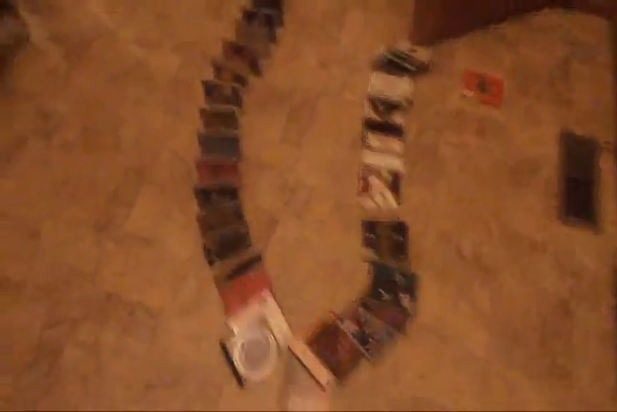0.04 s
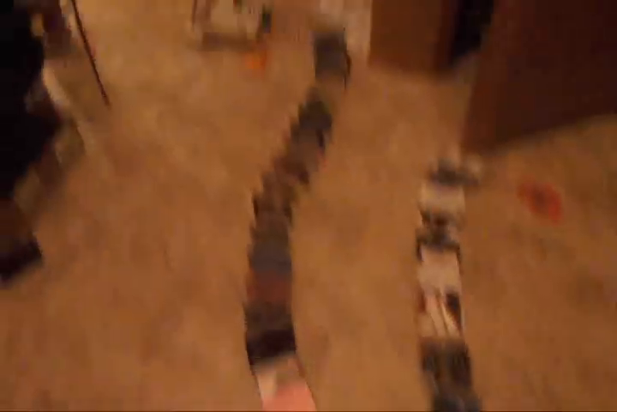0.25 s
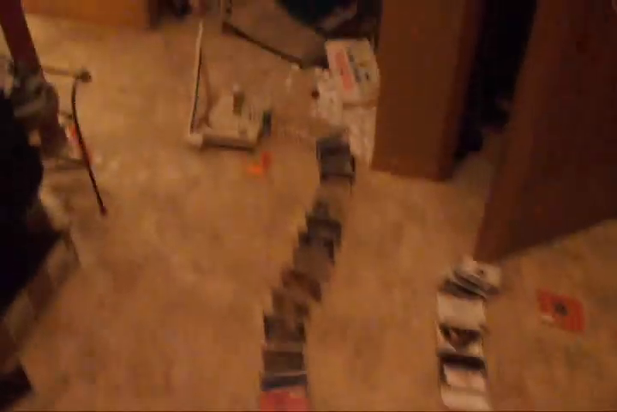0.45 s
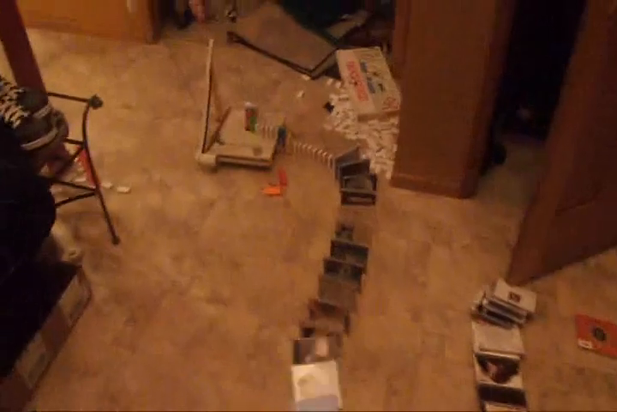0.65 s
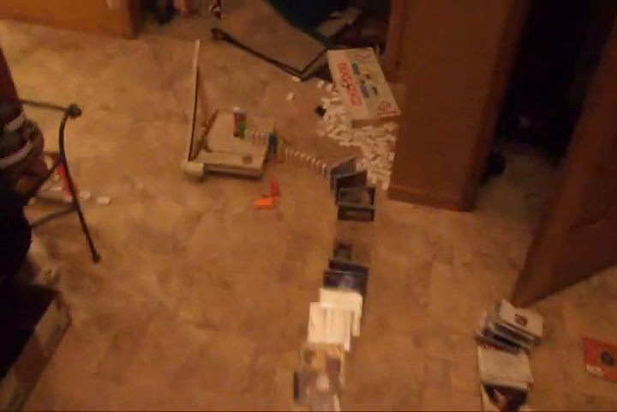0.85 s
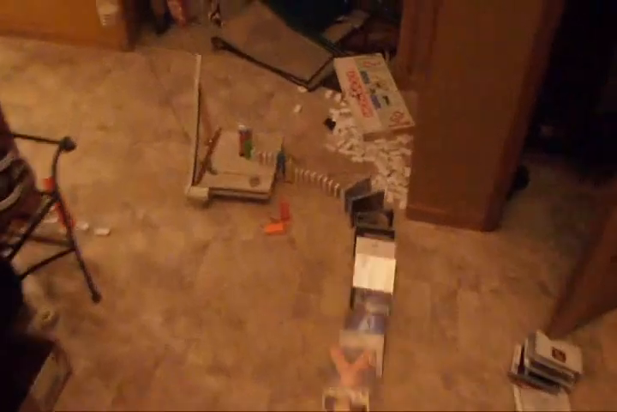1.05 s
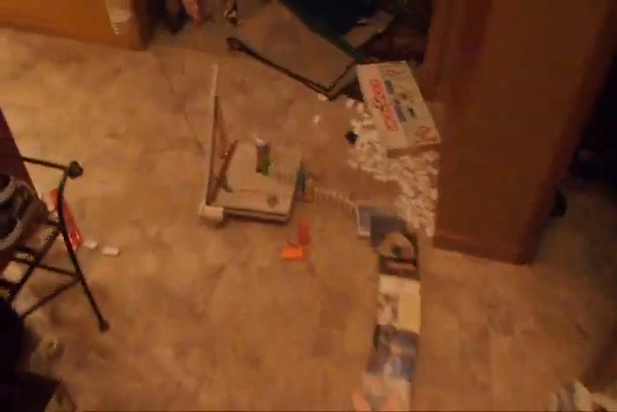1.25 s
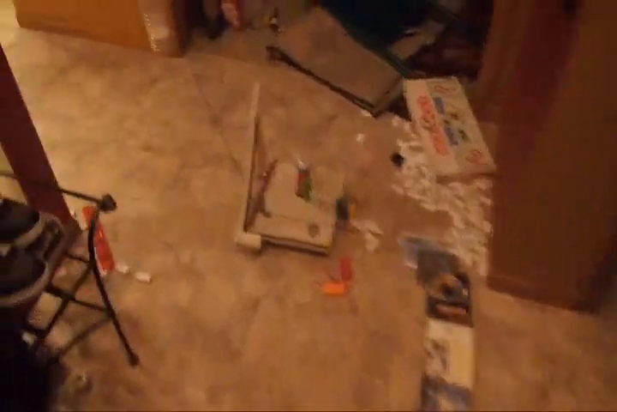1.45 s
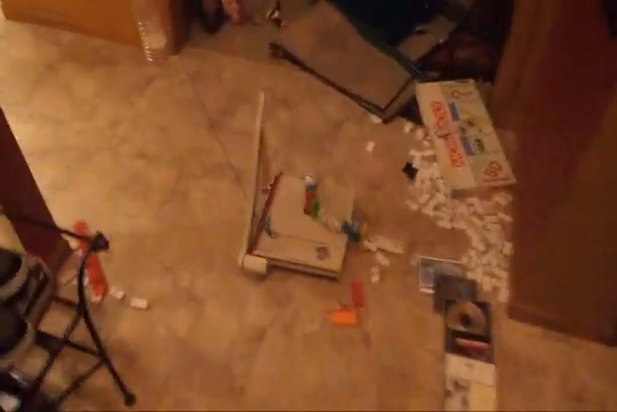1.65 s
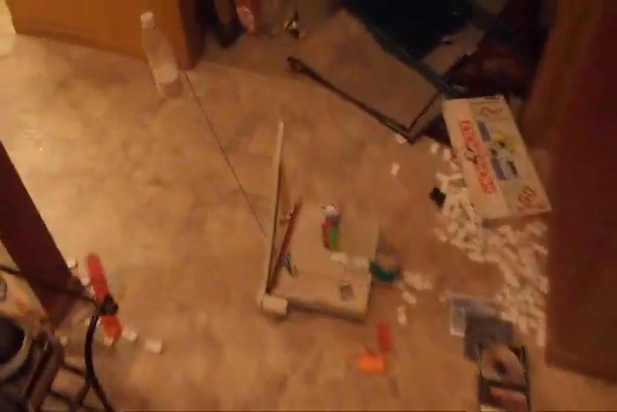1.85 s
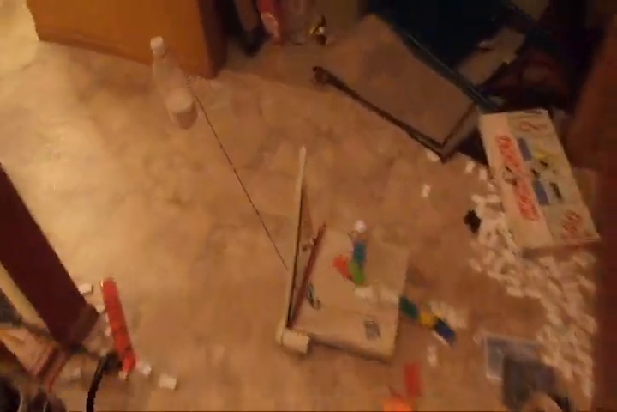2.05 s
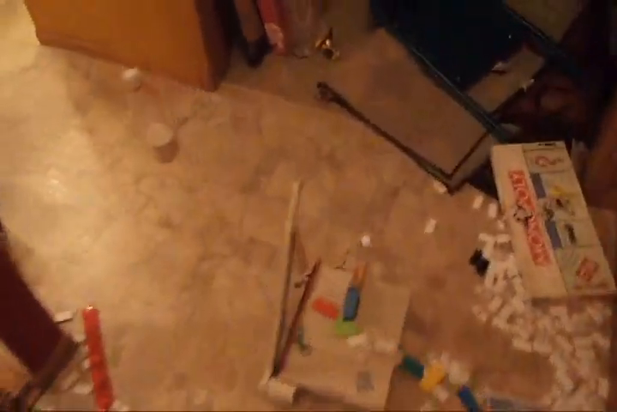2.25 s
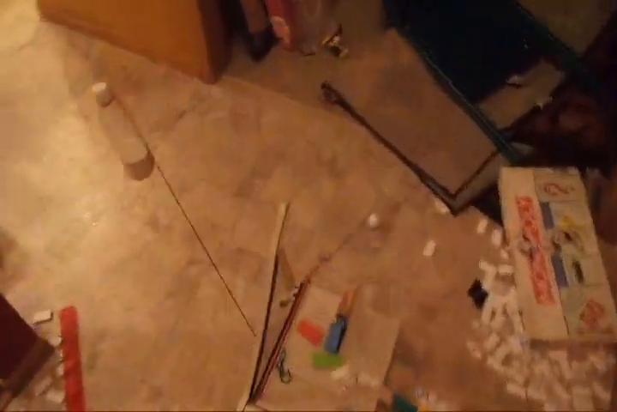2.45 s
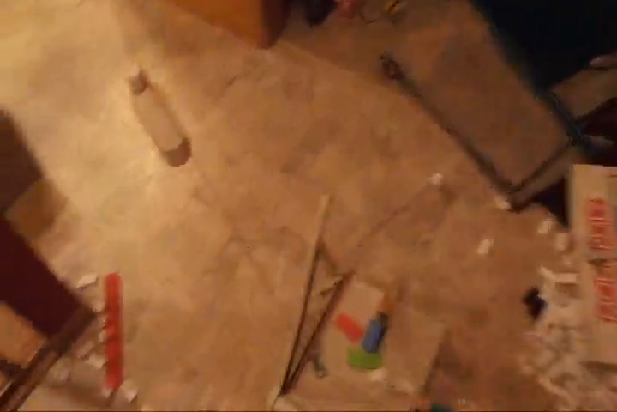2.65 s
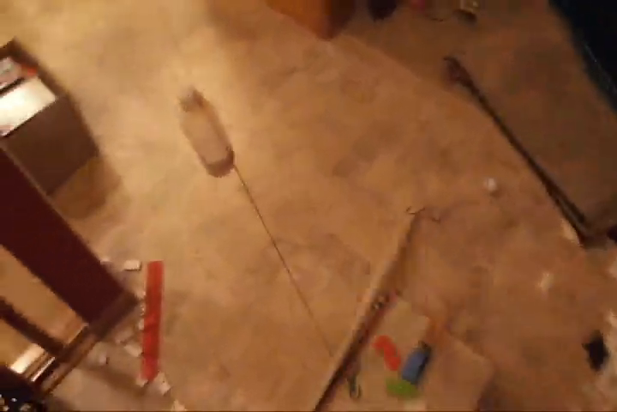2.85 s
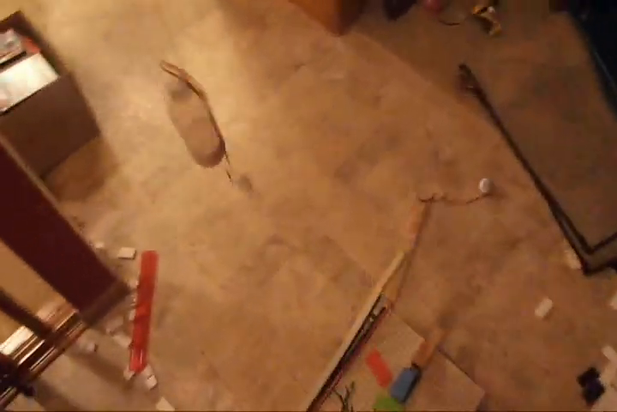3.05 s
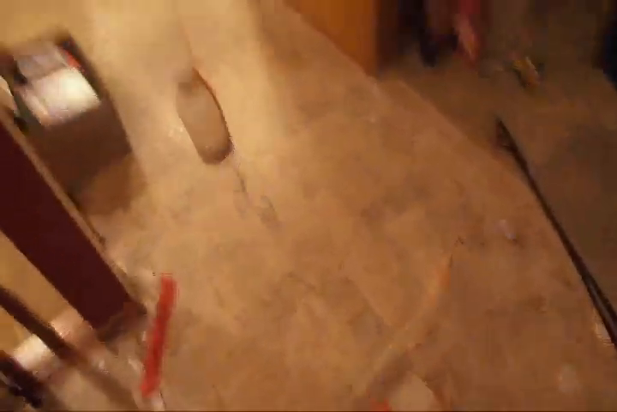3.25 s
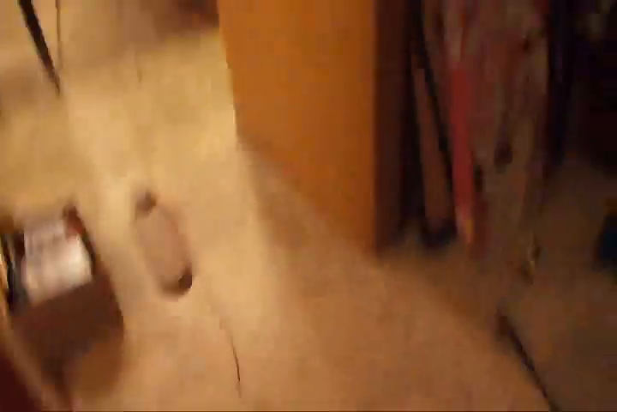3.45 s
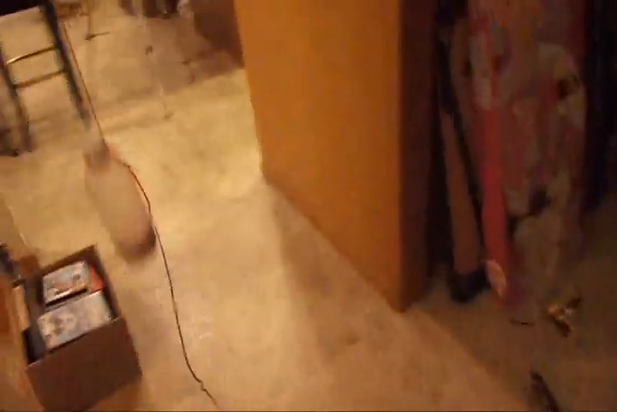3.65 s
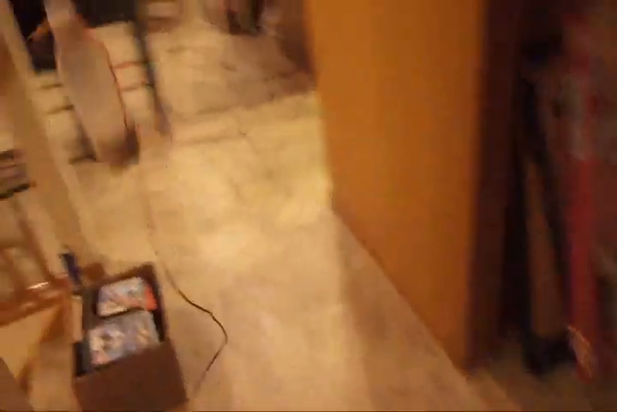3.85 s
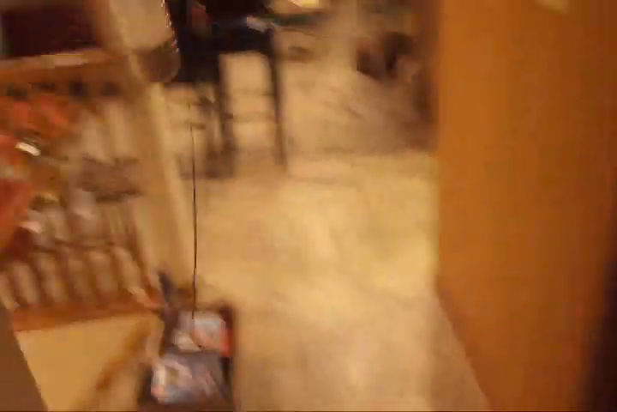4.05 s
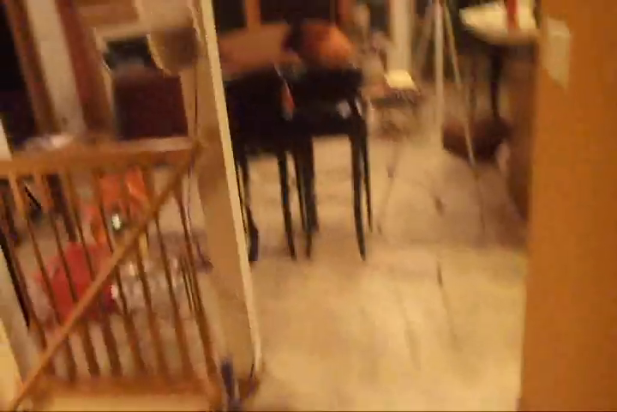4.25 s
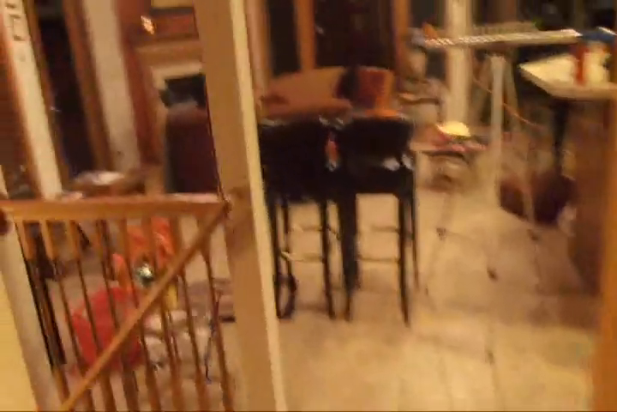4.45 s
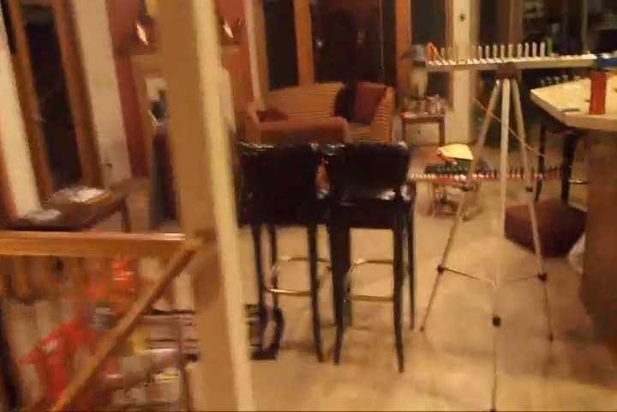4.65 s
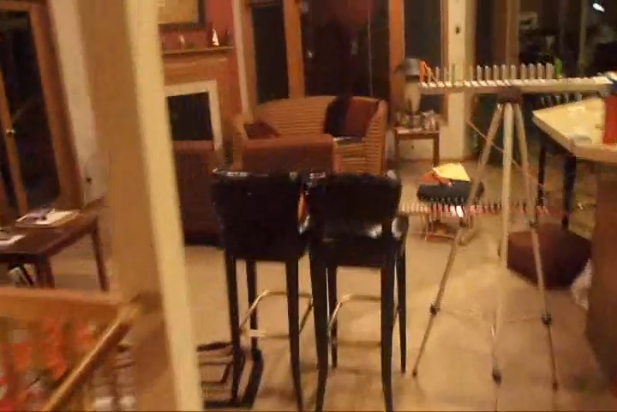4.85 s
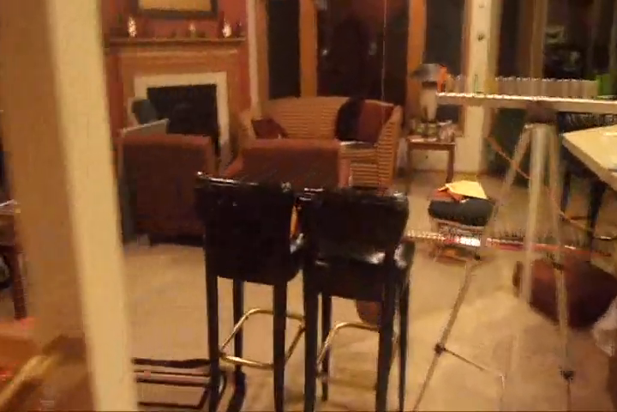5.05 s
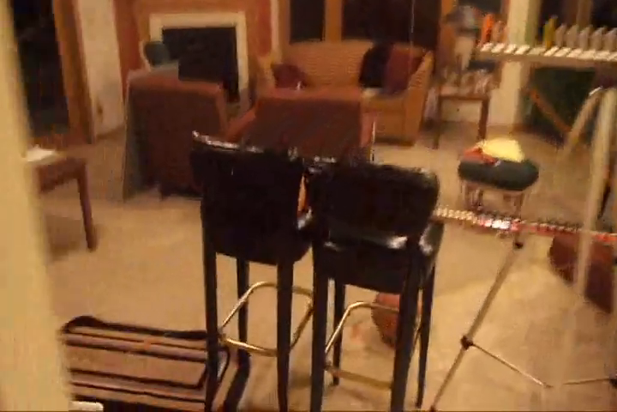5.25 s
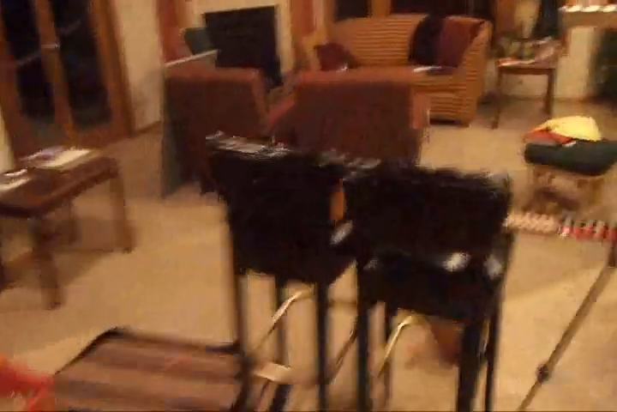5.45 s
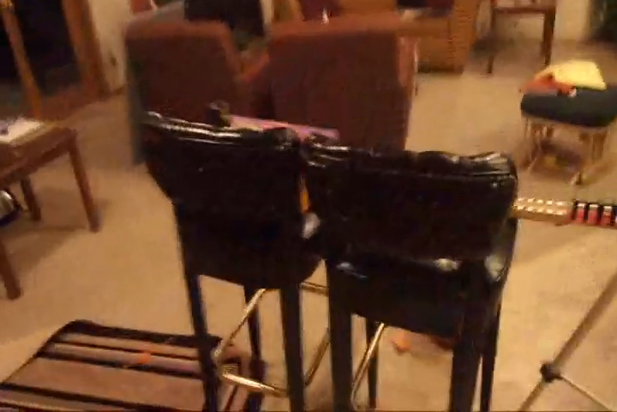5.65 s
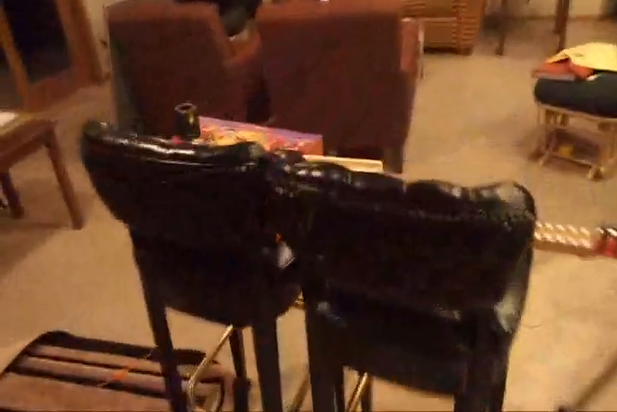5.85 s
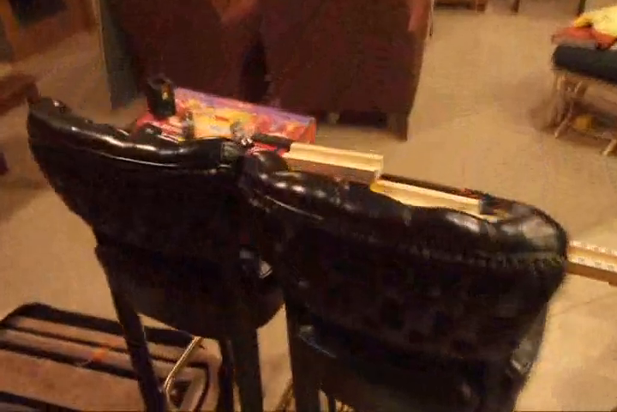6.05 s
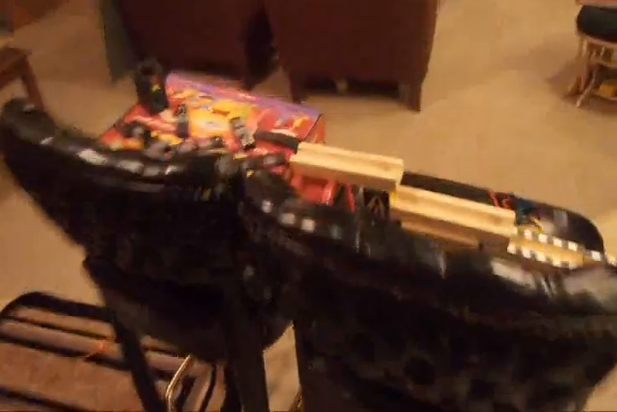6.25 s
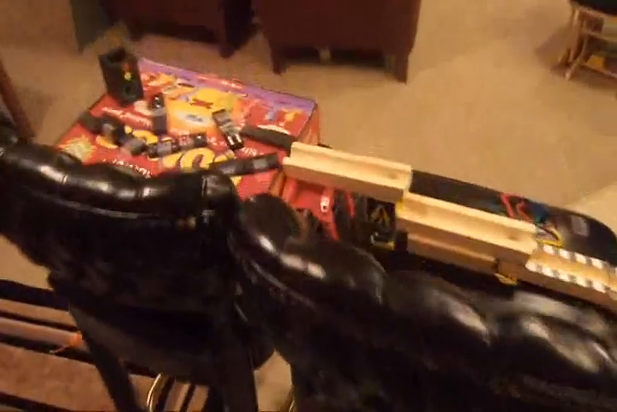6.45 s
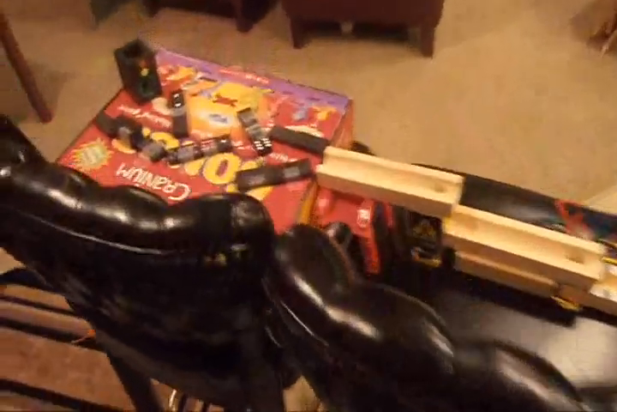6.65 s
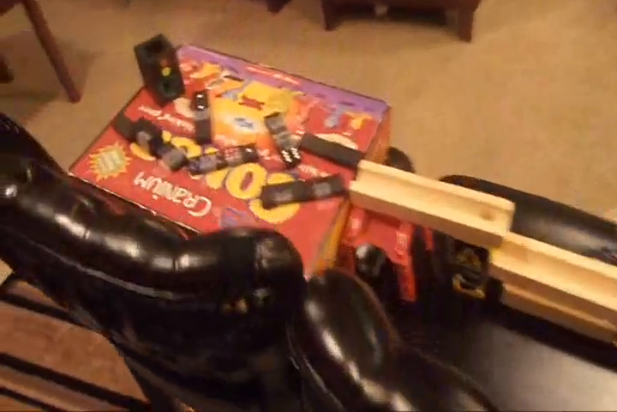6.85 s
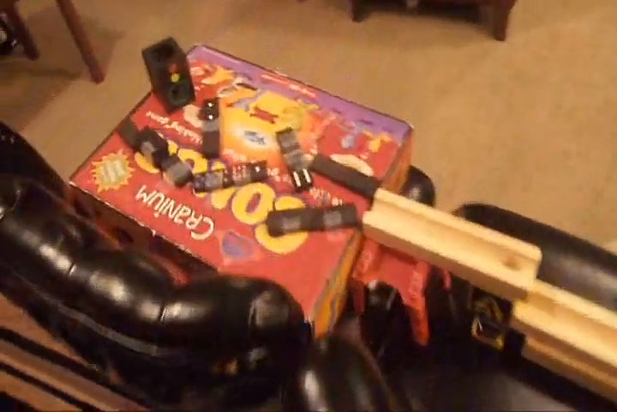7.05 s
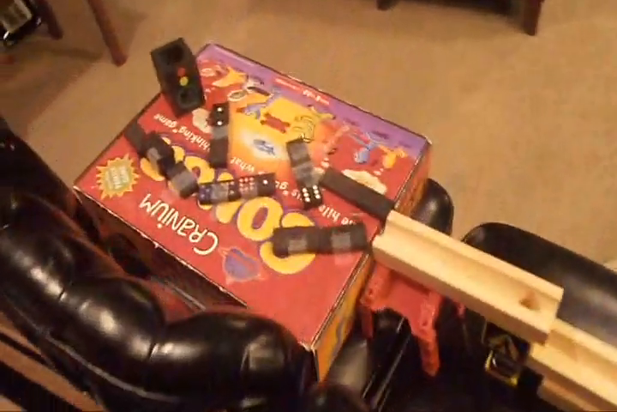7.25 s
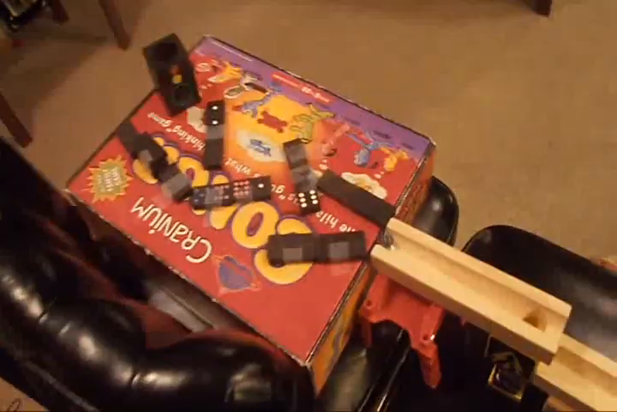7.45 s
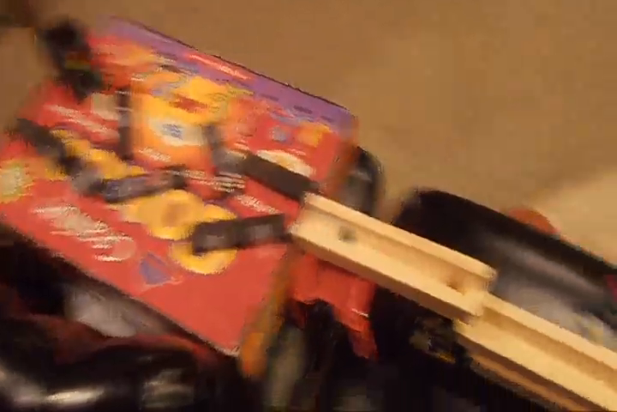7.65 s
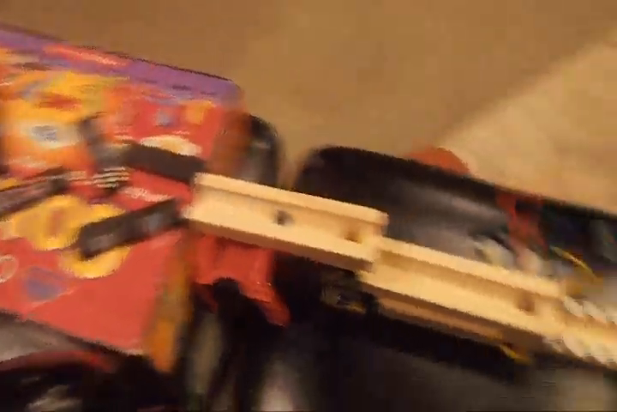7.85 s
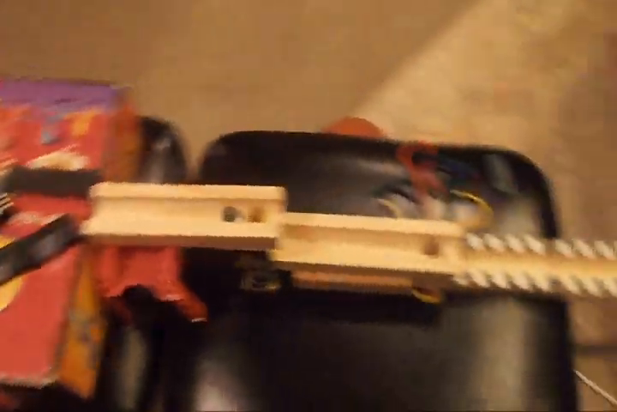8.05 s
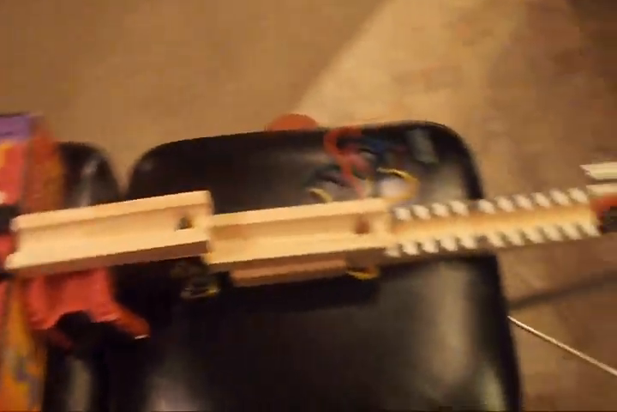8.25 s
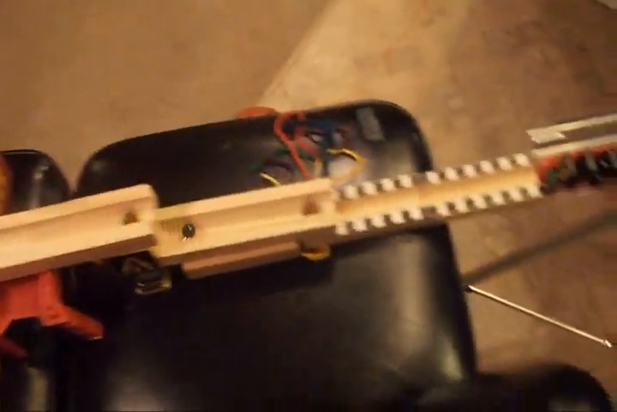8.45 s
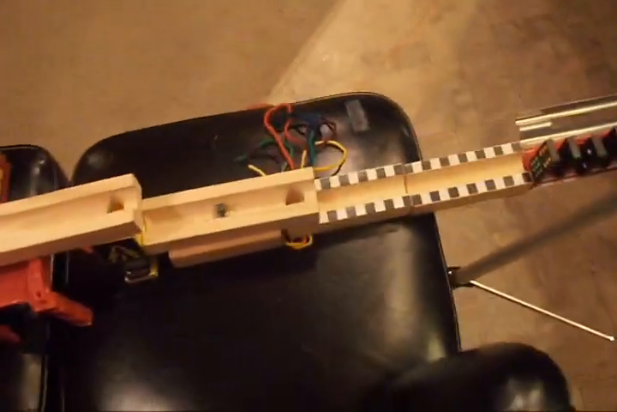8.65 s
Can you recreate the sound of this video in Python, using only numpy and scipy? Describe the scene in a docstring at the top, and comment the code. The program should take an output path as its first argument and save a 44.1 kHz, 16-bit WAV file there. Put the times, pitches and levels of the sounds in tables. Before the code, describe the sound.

From the start, a row of plastic cases topples on a hard indoor floor in rapid, hollow slaps. At about 1.4 seconds, small dominoes take over with a brighter clatter that thins out. Hard blocks click from 2.2 seconds, and a board knocks several times. A loose part rattles, then at 3 seconds a frame slams down, scrapes briefly and bounces until about 3.5. Low footstep thuds and brushing follow as the hand-held microphone moves. Further off, something knocks lightly near 4.8 seconds, lands loudly at 5.3 and bounces until 5.8, sliding or rolling in between. The brushing fades to a quieter stretch. Around 7.5 seconds a marble taps lightly on a wooden ramp, then strikes the end and drops onto the next ramp with sharp clicks from 8.3 to 8.5. The hits carry a short room echo over a faint hush, the loudest overloading slightly.

```python
"""A row of plastic cases topples on a hard floor indoors, each slapping down on the one before it.
Small hard tiles and blocks clatter down, a board knocks, a frame slams and bounces, something drops
further off and slides or rolls between bounces, and a marble falls through wooden ramps. Each blow is a
noisy crack plus ringing modes, echoed by the room. A hand-held microphone follows on foot, with thuds
and brushing over a faint hush; it colours the blows and overloads on the loudest."""
import sys
import numpy as np
from scipy import signal
from scipy.fft import rfft, irfft
from scipy.io import wavfile
from scipy.ndimage import uniform_filter1d

SR = 44100
rng = np.random.default_rng(int(sys.argv[2]) if len(sys.argv) > 2 else 0)


def dump_mix(stems):
    """Bounce the given channels to the path in sys.argv[1] as a 16-bit WAV at rate SR."""
    frames = np.atleast_2d(stems).T  # one column per channel
    limited = np.clip(frames, -1, 1)  # hard clip at full scale
    pcm = np.round(limited * 32767).astype(np.int16)
    wavfile.write(sys.argv[1], SR, pcm)


N = 384552
PLACES = 6  # room feeds; signal row 0 is the direct sound
OFF_DB = -np.inf


def undb(db):
    """Decibels to gain."""
    return 10 ** (np.asarray(db, float) / 20)


def unit(x):
    """Scale to rms 1."""
    return x / np.sqrt(np.mean(x ** 2))


def curve(points):
    """Interpolate (seconds, value) points per sample."""
    return np.interp(np.arange(N) / SR, *np.transpose(points))


def colour(x, points):
    """Minimum-phase filter through (Hz, dB) points."""
    hz, db = np.transpose(points)
    log_gain = np.interp(np.log(np.arange(1, 2050) * SR / 4096), np.log(hz), db) * np.log(10) / 20
    cepstrum = irfft(log_gain)
    cepstrum[1:2048] *= 2
    cepstrum[2049:] = 0
    return signal.fftconvolve(x, irfft(np.exp(rfft(cepstrum))))[:len(x)]


def noise(spectrum):
    """Noise of rms 1 shaped by (Hz, dB) points."""
    return unit(colour(rng.standard_normal(N), spectrum))


def wander(rate_hz):
    """Smooth random drift of rms 1."""
    hold = int(SR / rate_hz)
    steps = np.repeat(rng.standard_normal(N // hold + 1), hold)
    return unit(uniform_filter1d(uniform_filter1d(steps, hold), hold)[:N])


def swells(events, depth_db=30):
    """Envelope of swells, each falling depth_db a half length from its peak; powers add."""
    t = np.arange(0, N / SR + .01, .002)
    power = sum(undb(db - depth_db * np.abs(t - peak_s) / half_s) ** 2 for peak_s, db, half_s in events)
    return np.interp(np.arange(N) / SR, t, np.sqrt(power))


# Each row: frequency in Hz, relative level in dB.
HUSH_SPECTRUM = [(15, -50.5), (25, -16.5), (157, -3), (184, -7.5), (229, -5.5), (343, -6.5), (437, -8.5),
                 (474, -11.5), (692, -14), (883, -17.5), (2270, -27.5), (5110, -30), (15900, -32)]
def hush():
    """Faint, low, nearly steady background noise."""
    return undb(-43 + 0.5 * wander(2.6)) * noise(HUSH_SPECTRUM)


# Each row: peak time in seconds, level in dB.
THUDS = [(3.08, -21), (3.16, -23), (3.34, -27), (3.47, -27), (3.57, -29), (3.69, -28), (4.069, -38.5),
         (4.2, -42), (4.75, -28), (5.07, -48), (5.19, -32), (5.41, -37), (5.56, -31), (6.0, -45)]
# Each row: peak time in seconds, level in dB, half length in seconds.
FRICTION_SWELLS = [(3.8, -53.5, 0.33), (4.04, -38.5, 0.024), (4.67, -42, 1), (5.01, -44, 0.18),
                   (5.11, -38.5, 0.34), (5.5, -34.5, 0.29), (5.58, -32, 0.15), (5.72, -30.5, 0.23),
                   (5.86, -33.5, 0.2), (6.264, -40.5, 0.24), (6.51, -52, 0.031), (6.83, -46.5, 0.21),
                   (7.33, -51, 0.63), (7.9, -52.5, 0.27), (8.03, -52, 0.056), (8.22, -49, .2)]
# Each row: frequency in Hz, relative level in dB.
FRICTION_SPECTRUM = [(300, -12), (800, -4), (1300, -3), (1800, -13), (3000, -11.5), (4200, -24),
                     (6500, -17), (9000, -33.5)]
def thuds_and_friction(thud_half_s=0.11, rumble_db=-54):
    """Steps and the frame's landings thud through floor and hand.
    Cloth and soles brush, and the dropped thing slides or rolls between its bounces."""
    low = noise([(20, -30), (40, -12), (60, -4.5), (100, -13.5), (300, -58)])
    friction = noise(FRICTION_SPECTRUM)
    thuds = swells([(s, db, thud_half_s) for s, db in THUDS])
    handling = undb(rumble_db + 4.09 * wander(8.1))
    grain = undb(3 * wander(40))
    return (thuds + handling) * low + swells(FRICTION_SWELLS) * grain * friction


# Each row: frequency in Hz, T60 in seconds.
ROOM_DECAY = [(125, 0.54), (300, 0.62), (700, 0.49), (1800, 0.67), (4800, 0.373), (12000, 0.14)]
def room(x, tail_db=-4.5, build_s=0.0028):
    """Hard walls and floor return a diffuse tail from each place; the treble dies first."""
    t = np.arange(int(.9 * SR)) / SR
    bin_hz, frame_s, spectra = signal.stft(rng.standard_normal((PLACES, len(t))), SR, nperseg=256)
    hz, t60_s = np.transpose(ROOM_DECAY)
    bin_t60_s = np.interp(np.log(bin_hz + 1), np.log(hz), t60_s)[:, None]
    spectra *= np.exp(-np.log(1000) * frame_s / bin_t60_s)
    tails = signal.istft(spectra, SR, nperseg=256)[1][:, :len(t)]
    tails *= 1 - np.exp(-t / build_s)
    tails /= np.linalg.norm(tails, axis=1, keepdims=True)
    return x[0] + undb(tail_db) * signal.fftconvolve(x[1:], tails, axes=1)[:, :N].sum(axis=0)


HOLLOW_HZ, SPLIT_HZ = 700, 1900  # low modes lie below SPLIT_HZ, hollow ones between the two
SCATTER_DB, EDGE_S = 2.5, 0.0025
def blows(events, modes, rise_s, crack_s, detune, wet_db, smear_rad=2, crack_taps=24, edge_db=OFF_DB):
    """Short noisy contacts ring clusters of four close modes, differently each time.
    Fewer crack_taps thin the crack to treble; a fifth event column scales the hollow modes' pitch."""
    hz, db, t60_s = np.repeat(np.transpose(modes)[:, :, None], repeats=4, axis=1)
    offset = np.tile([-1.5, -.5, .5, 1.5], len(modes))[:, None]
    t = np.arange(int(.11 * SR)) / SR
    fade = np.exp(-np.log(1000) * t / t60_s)
    contact = 1 - np.exp(-t / rise_s)  # flat faces meet over a moment, hard corners at once
    low = hz[:, 0] < SPLIT_HZ
    hollow = low & (hz[:, 0] > HOLLOW_HZ)
    out = np.zeros((1 + PLACES, N + len(t)))
    for k, (start_s, crack_db, low_db, high_db, *scale) in enumerate(events):
        bend, size, phase = rng.standard_normal((3, len(hz), 1))
        pitch_hz = hz * (1 + detune * (offset + 0.42 * bend))
        pitch_hz[hollow] *= np.prod(scale)
        rings = undb(db + SCATTER_DB * size) * np.sin(2 * np.pi * pitch_hz * t + smear_rad * phase) * fade
        hiss = rng.standard_normal(len(t))
        crack = (hiss - uniform_filter1d(hiss, crack_taps)) * np.exp(-t / crack_s)
        parts = (crack_db, crack), (low_db, rings[low].sum(axis=0)), (high_db, rings[~low].sum(axis=0))
        blow = contact * sum(undb(part_db) * part / np.abs(part).max() for part_db, part in parts)
        blow += undb(crack_db + edge_db) * np.gradient(hiss) * np.exp(-t / EDGE_S)  # edge hits first
        i = int(start_s * SR)
        out[0, i:i + len(t)] += blow
        out[1 + k % PLACES, i:i + len(t)] += undb(wet_db) * blow
    return out[:, :N]


# Each row: start in seconds, crack, low-mode and high-mode levels in dB.
DROP_HITS = [(4.036, -36.5, -33, -32), (4.7328, -31, -23, -28), (4.79, -33, -20.5, -18),
             (4.796, -17, -25.5, -21), (4.8374, -41, -25.5, -38), (4.9715, -43.5, -26.5, -50),
             (5.2761, 2.5, 0, -3.5), (5.3, -12, -13, -13), (5.5134, -6, -10.5, -15), (5.551, -40, -18, -13),
             (5.566, -38, -29.5, -24), (5.6512, -5, -13.5, -16.5), (5.8035, -38, -22.5, -23),
             (5.818, -10.5, -31, -13.5), (6.5056, -30, -38, -36)]
# Each row: frequency in Hz, level in dB, T60 in seconds.
DROP_MODES = [(176, -6, 0.044), (314, 4.5, 0.035), (477, -0.5, 0.031), (717, 1.5, 0.031),
              (1078, 4.5, 0.031), (1290, -1, 0.049), (1597, 3, 0.017), (2090, 2.5, 0.013), (2670, 4, 0.014),
              (3160, 1.5, 0.0099), (4420, -0.5, 0.0059), (5440, 0, 0.0093), (6600, -7, 0.0081),
              (10800, -8, 0.0079)]
def far_drops():
    """Something drops and bounces further off, with more room in its sound."""
    return blows(DROP_HITS, DROP_MODES, rise_s=0.000049, crack_s=0.0039, detune=0.041, wet_db=1)


# Each row: start in seconds, crack, low-mode and high-mode levels in dB.
RAMP_HITS = [(7.4314, -27, -27, -43.5), (7.476, -51.5, -37, -57), (7.5284, -44, -33, -59),
             (7.6019, -32, -23, -11), (7.6195, -47, -26.5, -18), (7.633, -50, -33, -34),
             (7.642, -50, -37, -34), (7.65, -48, -41, -29), (8.0214, -52, -48.5, -36),
             (8.1504, -42, -53.5, -45), (8.174, -45, -51, -33)]
LOWER_RAMP_HITS = [(8.4555, -10, -26, -10), (8.4756, -10, -28, -10), (8.503, -29, -33, -20),
                   (8.517, -34, -42, -18), (8.527, -42, -47, -21)]
STOP_HITS = [(8.323, -14, -17, -13.5), (8.392, -9, -15.5, -12.5), (8.4071, -8.5, -21, -10)]
# Each row: frequency in Hz, level in dB, T60 in seconds.
RAMP_MODES = [(880, -11, 0.025), (1140, 15, 0.0083), (1360, 11, 0.015), (2290, -2, 0.059), (3030, 6.5, 0.1),
              (3320, -1, 0.09), (5300, -9, 0.03)]
LOWER_RAMP_MODES = [(920, -21, 0.0095), (1510, 5, 0.027), (2180, -9, .03), (2760, 3, 0.1), (3000, -6, 0.06),
                    (3270, -4, 0.12), (4470, -13, .04), (6100, -8, 0.032)]
STOP_MODES = [(460, -0.5, 0.018), (970, 0, 0.0066), (1340, 9, 0.0056), (2070, -8, 0.06), (3000, -12, 0.022),
              (5620, 9, 0.046), (7000, -11, 0.034), (8300, -10.5, .015)]
def marble():
    """A marble taps a wooden ramp, strikes its end stop and lands on the next ramp down."""
    ramp = blows(RAMP_HITS, RAMP_MODES, rise_s=.0001, crack_s=0.0025, detune=0.0157,
                 wet_db=-10.5, smear_rad=0.75)
    landing = blows(LOWER_RAMP_HITS, LOWER_RAMP_MODES, rise_s=.0001, crack_s=0.0024, detune=0.0198,
                    wet_db=-5.5, smear_rad=0.46)
    stop = blows(STOP_HITS, STOP_MODES, rise_s=.0001, crack_s=0.0035, detune=0.0076,
                 wet_db=-8.5, smear_rad=0.72)
    return ramp + stop + landing


def skid(start_s=3.013, end_s=3.08, level_db=-8):
    """The frame scrapes, harsh and uneven, until it lands."""
    t = np.arange(N) / SR
    scrape = noise([(300, -12), (1500, -4), (3000, -4), (4200, 4), (5400, 10), (6500, 5.5), (14000, 6)])
    out = np.zeros((1 + PLACES, N))
    out[:2] = undb(level_db + 6 * wander(330)) * scrape * (t > start_s) * (t < end_s)
    return out


# Each row: start in seconds, crack, low-mode and high-mode levels in dB.
RATTLE_HITS = [(2.8607, -13, -17.5, -15), (2.869, -29, -15, -20), (2.8853, -19, -18.5, -21),
               (2.897, -27, -28, -20), (2.92, -26, -38, -30), (2.941, -30, -25, -32),
               (2.953, -26, -26, -33), (2.982, -27, -31, -37)]
FRAME_HITS = [(3.0054, -39, -14, -42), (3.0123, 11, -10, -15), (3.0524, -1, 6, -20),
              (3.1544, -8, -17, -9.5), (3.2023, -18, -23, -13), (3.2568, -17, -23, -13.5),
              (3.2812, -17, -4.5, -23), (3.2895, -8.5, -5.5, -8), (3.3105, -9, -30, -11),
              (3.4317, -32, -13, -34), (3.4362, -7.5, -8, -9.5), (3.46, -9.5, -30, -20),
              (3.5358, -12.5, -10.5, -17.5), (3.8251, -51, -29, -59.5), (3.869, -37, -28, -57)]
# Each row: frequency in Hz, level in dB, T60 in seconds.
RATTLE_MODES = [(696, -6, 0.01), (1110, 5, 0.0086), (1500, 5, 0.011), (2520, 3, 0.054), (3510, 3, 0.063),
                (4700, 0, 0.023), (5560, -2, 0.036), (6700, -3, 0.054)]
FRAME_MODES = [(117.4, 0, 0.23), (163, -1.5, 0.11), (201, 0.5, 0.11), (285, -1.5, 0.087), (394, -6.5, 0.07),
               (504, -2.5, 0.035), (744, -5.5, 0.041), (987, -4.5, 0.058), (1370, -3, 0.024),
               (2400, -4, 0.032), (3200, -7.5, 0.14), (3460, -6.5, 0.12), (4580, 2.5, 0.032),
               (5460, 3, 0.04), (6500, 0.5, 0.035)]
def frame():
    """A loose part shakes, then the frame slams down and bounces."""
    rattle = blows(RATTLE_HITS, RATTLE_MODES, rise_s=0.00016, crack_s=0.002, detune=0.025,
                   wet_db=0, crack_taps=40)
    slam = blows(FRAME_HITS, FRAME_MODES, rise_s=0.00026, crack_s=0.013, detune=0.05, wet_db=-1.9)
    return rattle + slam


# Each row: start in seconds, crack, low-mode and high-mode levels in dB.
BOARD_HITS = [(2.375, 2, -4, -16), (2.547, -1, -1, -21), (2.662, -16, -7, -37), (2.756, -23, -14, -19),
              (2.828, -25, -18, -25), (2.836, -28, -12, -22.5)]
# Each row: frequency in Hz, level in dB, T60 in seconds.
BOARD_MODES = [(218, 4, 0.04), (288, 0, 0.052), (434, 3.5, 0.068), (558, -0.5, 0.058), (732, -0.5, 0.025),
               (869, -2.5, 0.047), (938, 0.5, 0.054), (1427, 2, 0.02), (2380, 7, 0.01), (2970, 0, 0.045)]
def board():
    """A board knocks, ringing mostly in its low modes."""
    return blows(BOARD_HITS, BOARD_MODES, rise_s=.0002, crack_s=0.0037, detune=0.077,
                 wet_db=-3, crack_taps=60)


# Each row: start in seconds, crack, low-mode and high-mode levels in dB.
BLOCK_HITS = [(2.2054, 11.5, -7.5, -1), (2.2684, 0, -16, 1.5), (2.277, -8, -25, -20),
              (2.284, -14, -13.5, -23.5), (2.301, -5, -28, -29), (2.3298, 2, -22, -3),
              (2.337, -8, -21, -22), (2.3698, 4, -10.5, -3), (2.386, -3, -23, -18), (2.4144, -22, -36, -21),
              (2.4788, -19, -22.5, -31), (2.5008, 10, -12, -8)]
# Each row: frequency in Hz, level in dB, T60 in seconds.
BLOCK_MODES = [(434, -9.5, 0.049), (871, -1.5, 0.057), (1320, 1, 0.024), (2480, -10, .03),
               (3250, -3.5, .03), (5440, 4.5, 0.037), (6820, -4, 0.027), (9200, -6, 0.066),
               (12500, -8, .06)]
def blocks():
    """Hard blocks land with sharp clicks."""
    return blows(BLOCK_HITS, BLOCK_MODES, rise_s=0.000051, crack_s=0.0042, detune=0.0085, wet_db=-3)


# Each row: time in seconds, level in dB.
CLATTER_LEVEL = [(0, -21.5), (.4, -27), (.95, -25.5), (1.33, -24), (1.4, -16.5), (1.47, -16), (1.66, -29),
                 (1.8, -28), (2.0, -27.5), (2.42, -31.5), (2.55, -39), (2.7, -50), (2.85, -48.5),
                 (3.0, -43)]
def clatter(ticks_per_s=220, case_db=-8, snap_db=6, snap_s=0.0036):
    """Dense, uneven small contacts across the floor ring the cases, then the tiles, which thin out."""
    length = int(CLATTER_LEVEL[-1][0] * SR)
    gain = undb(curve(CLATTER_LEVEL)[:length])
    tile_share = curve([(1.33, .1), (1.4, 1), (1.59, 1), (1.84, .05)])[:length]
    t = np.arange(int(.1 * SR)) / SR

    def ring(modes, detune):
        return sum(undb(db) * np.sin(2 * np.pi * hz * (1 + detune * rng.standard_normal()) * t)
                   * np.exp(-np.log(1000) * t / t60_s) for hz, db, t60_s in modes)

    out = np.zeros((1 + PLACES, N))
    for place in range(1, 1 + PLACES):
        onsets = rng.random(length) < ticks_per_s / SR
        ticks = onsets * undb(1.5 * rng.exponential(size=length)) * rng.standard_normal(length)
        case, tile = ring(CASE_MODES[3:], detune=.13), ring(TILE_MODES, detune=.01)
        hiss = rng.standard_normal(len(t))
        snap = (hiss - uniform_filter1d(hiss, 24)) * np.exp(-t / snap_s)
        case, tile, snap = (unit(signal.fftconvolve(ticks, x)[:length]) for x in (case, tile, snap))
        rings = np.sqrt(1 - tile_share) * undb(case_db) * case + np.sqrt(tile_share) * tile
        out[place, :length] = gain * (rings + undb(snap_db) * snap) / np.sqrt(PLACES)
    out[0] = undb(-1) * out.sum(axis=0)
    return out


# Each row: start in seconds, crack and high-mode levels in dB.
TILE_HITS = [(1.366, 5, -19), (1.3746, -4, 11.5), (1.4013, 13, 18.5), (1.418, 4, 13.5), (1.4344, 9, 13.5),
             (1.4468, 3, 13), (1.463, 2, -2.5), (1.4714, -10, 5.5), (1.513, -2, 2), (1.5323, 4.5, 6),
             (1.544, 9, 5), (1.585, -3, 1), (1.604, -5, -4), (1.622, -20, -8), (1.674, -18, -22),
             (1.6996, -14, -9), (1.706, -7, -12), (1.716, -14, -7), (1.73, -16, -8), (1.747, -23, -9),
             (1.7552, -3.5, 1), (1.7694, -4, -1), (1.779, -20, -10), (1.7901, -7, 4.5), (1.809, -14, -8),
             (1.825, -19, -15), (1.8355, 7.5, 1), (1.847, 5, -7), (1.858, -9, -8), (1.866, -20, -12),
             (1.879, 5, -5), (1.8923, 6.5, -1.5), (1.908, -12, -7), (1.928, 7, -1), (1.964, -6, -13),
             (1.987, 3, -9), (1.991, -1, -2.5), (2.0477, 10.5, 1), (2.053, 3.5, -13), (2.0836, -11, -7),
             (2.137, 0, -22), (2.1425, 5, -5.5), (2.1805, -15, -28), (2.371, -14, -0.5), (2.533, -6, -2.5),
             (3.097, -15, -1), (3.157, -14, -18), (3.289, -13, -3), (3.436, -11, -15), (3.459, -37, -6)]
# Each row: frequency in Hz, level in dB, T60 in seconds.
TILE_MODES = [(922, -6, 0.039), (1124, -4.5, 0.025), (1301, 3, 0.04), (3180, -4, 0.03), (5550, -17, 0.029),
              (7200, 12.5, 0.048), (8260, 5.5, 0.05), (10800, -4, .015)]
def tiles(low_re_crack_db=-19.5):
    """Each tile strikes the next or the floor with a treble crack and a high ring."""
    hits = [(s, crack_db, crack_db + low_re_crack_db, high_db) for s, crack_db, high_db in TILE_HITS]
    return blows(hits, TILE_MODES, rise_s=0.0003, crack_s=0.0017, detune=0.013,
                 wet_db=-1.7, smear_rad=1, crack_taps=7)


# Each row: start in seconds, crack and clack levels in dB, clack pitch in Hz, body level in dB.
CASE_HITS = [(0.0, -2, -14, 900, -12), (0.016, -5, -13, 1330, -13), (0.0517, -2, -12.5, 906, -16),
             (0.071, -21, -13, 860, -10), (0.1082, 4, -10, 986, -1.5), (0.156, 5.5, -8, 1530, -10),
             (0.199, -5, -24, 1240, -18), (0.2139, 7, -4.5, 1280, -11.5), (0.2705, 2, -16, 1340, -7.5),
             (0.2955, 10.5, -2, 1392, -8.5), (0.3426, 8.5, -5, 1400, -15), (0.3613, 11, -1, 1273, -8),
             (0.3937, 4.5, -15, 1250, -22), (0.434, 0.5, -10, 1290, -14.5),
             (0.4829, 2.5, -7.5, 1235, -14.5), (0.522, -6.5, -17, 1020, -10), (0.5544, 4.5, -5, 977, -5),
             (0.6148, 0.5, -10.5, 920, -12), (0.6526, -3.5, -11.5, 1000, -20), (0.6747, 1.5, -6, 1350, -16),
             (0.7144, -6, -19, 953, -18.5), (0.7484, 3, -2, 1040, -16), (0.777, 0, -6, 1004, -14),
             (0.809, 6, -6.5, 880, -10), (0.834, -1.5, -20.5, 1080, -14.5), (0.8571, 3.5, -3, 1046, -11),
             (0.891, -6, -11, 1000, -14.5), (0.9148, -1, -9, 980, -11.5), (0.9546, 3.5, -8, 1105, -14),
             (0.965, 0.5, -9, 1066, -15), (1.0129, 2.5, -5, 853, -12.5), (1.0656, 8, -1, 940, -11.5),
             (1.1364, 0, -0.5, 1116, -16.5), (1.1895, -0.5, -3, 1020, -11),
             (1.2292, -1.5, -12.5, 970, -18.5), (1.259, 7.5, -6, 878, -9.5), (1.304, 5, -7.5, 1110, -12),
             (1.32, 3, -8, 1000, -6)]
# Each row: start in seconds, level in dB.
EDGE_TICKS = [(0.03, 4.5), (0.091, 0), (0.108, 9), (0.517, -4.5), (0.554, 1.5), (0.594, 3), (0.652, 0.5),
              (0.714, -1.5), (0.893, -3.5), (0.938, -1.5), (1.003, 0.5), (1.12, 2), (1.136, 0),
              (1.178, -4.5), (1.226, -0.5)]
# Each row: frequency in Hz, level in dB, T60 in seconds.
CASE_MODES = [(77, -4.5, 0.12), (135, -1, 0.05), (216, -2, 0.066), (300.5, -3.5, 0.096), (382, 0, .06),
              (539, -2.5, 0.042), (862, 3, 0.039), (1058.4, 7.5, 0.05), (1308, 2, 0.04), (2480, -11.5, .02),
              (3180, 4.5, 0.023), (5520, -7.5, 0.027), (6390, -7.5, .015), (7100, 4.5, 0.01087)]
def cases(clack_mode_hz=1058, high_re_crack_db=-22):
    """Plastic cases slap onto each other with a hollow clack and a deep body; thin edges tick."""
    deep = [mode for mode in CASE_MODES if mode[0] < HOLLOW_HZ]
    upper = [mode for mode in CASE_MODES if mode[0] > HOLLOW_HZ]
    clack_hits = [(s, crack_db, clack_db, crack_db + high_re_crack_db, hz / clack_mode_hz)
                  for s, crack_db, clack_db, hz, _ in CASE_HITS]
    body_hits = [(s, OFF_DB, body_db, OFF_DB) for s, *_, body_db in CASE_HITS]
    edge_hits = [(s, db, OFF_DB, OFF_DB) for s, db in EDGE_TICKS]
    clacks = blows(clack_hits, upper, rise_s=0.0028, crack_s=0.01, detune=0.035,
                   wet_db=-3.5, smear_rad=1, edge_db=-7)
    bodies = blows(body_hits, deep + upper[-1:], rise_s=0.0056, crack_s=.01, detune=0.06,
                   wet_db=-2.5, smear_rad=1.5)  # blows needs one high mode, muted here
    edges = blows(edge_hits, upper, rise_s=0.0001, crack_s=0.0022, detune=0, wet_db=-2.5, crack_taps=4)
    return clacks + bodies + edges


# Microphone in its housing. Each row: frequency in Hz, gain in dB.
MIC_RESPONSE = [(20, -12.5), (70, -9.5), (500, 7.5), (1150, 8.5), (1800, -0.5), (3200, 0), (4200, -5),
                (5300, -1.5), (6800, 1), (8000, -6.5), (12000, -9), (15500, -18.5)]
def scene():
    """Blows, clatter and skid pass through room and microphone; hush, thuds and friction add directly."""
    falls = cases() + tiles() + blocks() + board() + frame() + far_drops() + marble() + clatter() + skid()
    return (colour(room(falls), MIC_RESPONSE) + hush() + thuds_and_friction())[None]


def record(dry, clip_level=.92, cutoff_hz=15900):
    """The input overloads near full scale; a steep low-pass cuts the top."""
    lowpass = signal.ellip(12, .2, 85, cutoff_hz, fs=SR, output="sos")
    return signal.sosfilt(lowpass, np.clip(dry, -clip_level, clip_level))


dry = scene()
out = record(dry)
dump_mix(out)
```